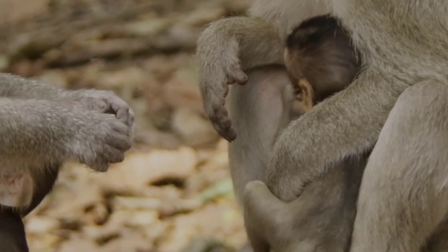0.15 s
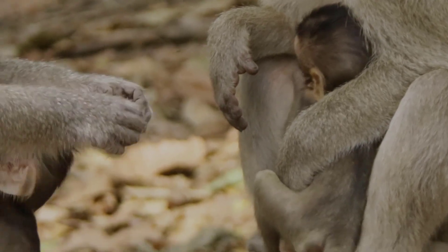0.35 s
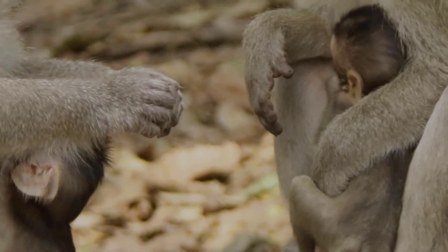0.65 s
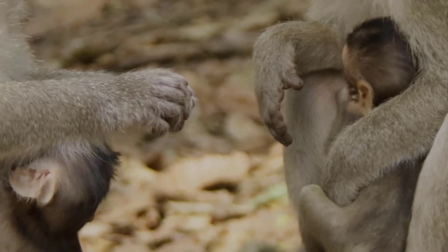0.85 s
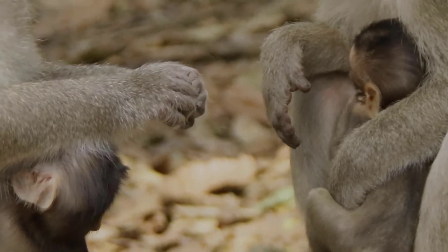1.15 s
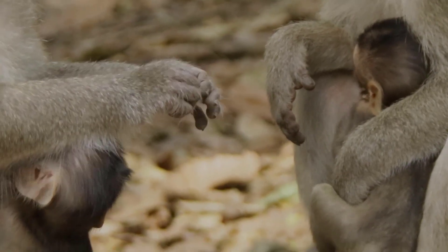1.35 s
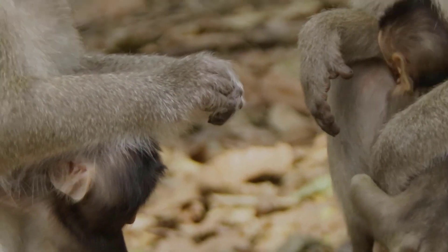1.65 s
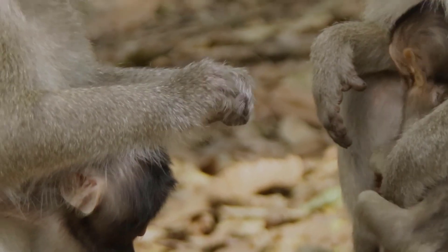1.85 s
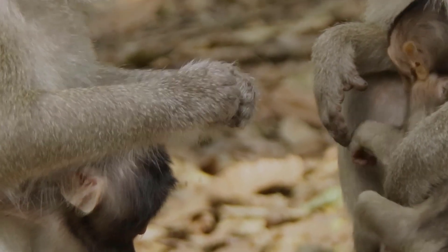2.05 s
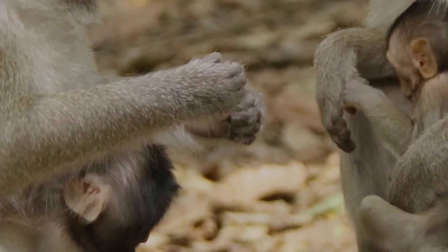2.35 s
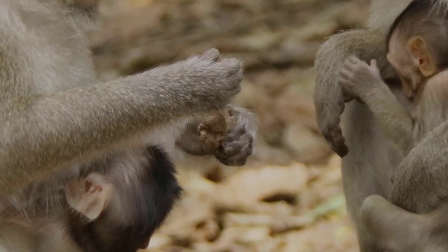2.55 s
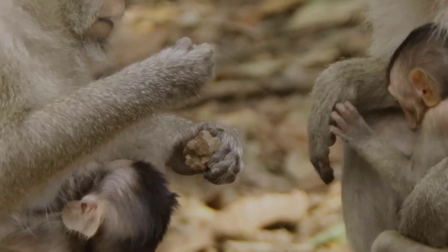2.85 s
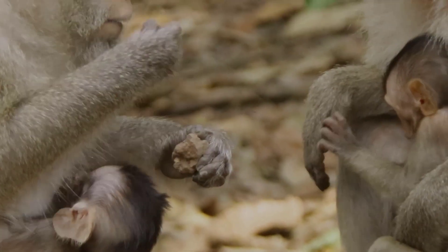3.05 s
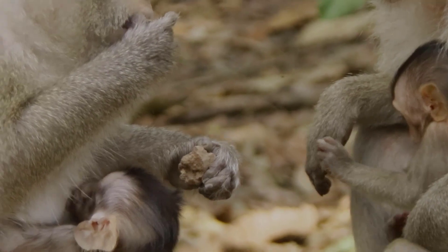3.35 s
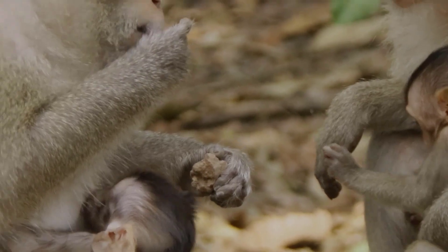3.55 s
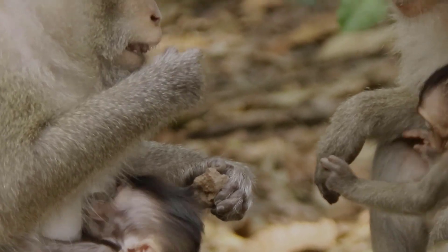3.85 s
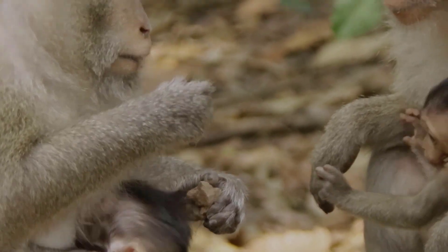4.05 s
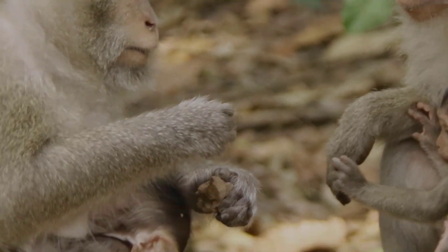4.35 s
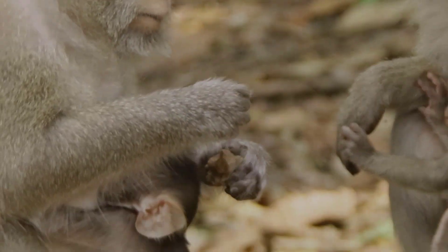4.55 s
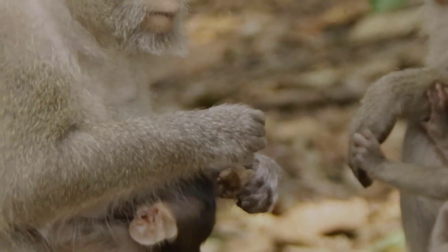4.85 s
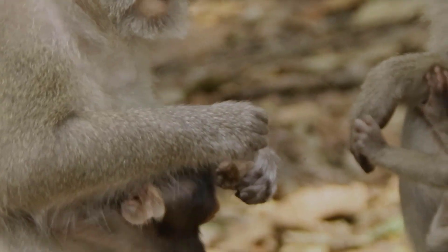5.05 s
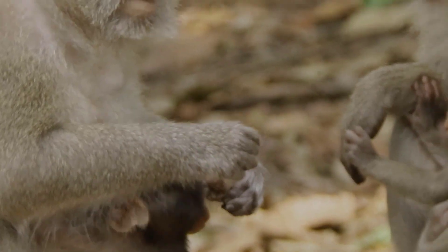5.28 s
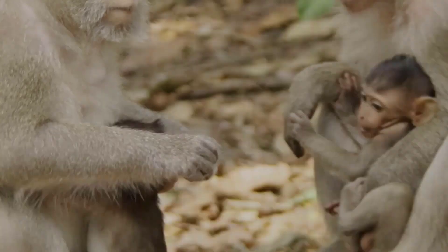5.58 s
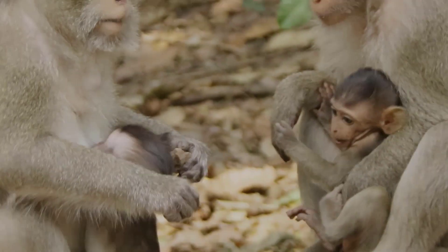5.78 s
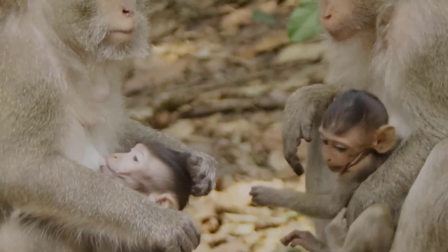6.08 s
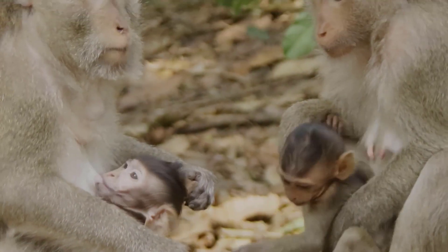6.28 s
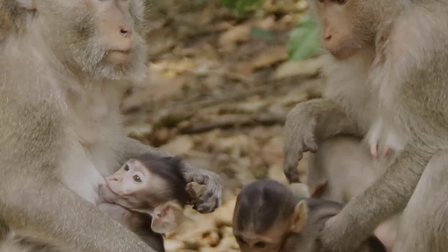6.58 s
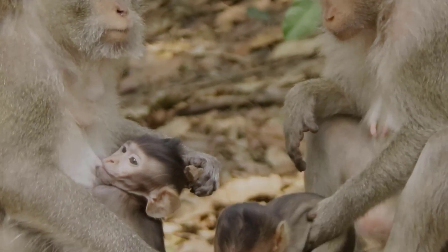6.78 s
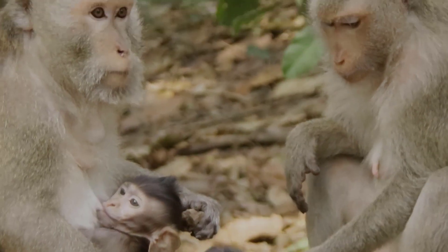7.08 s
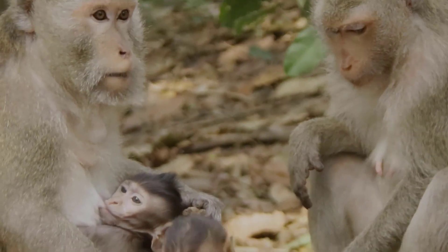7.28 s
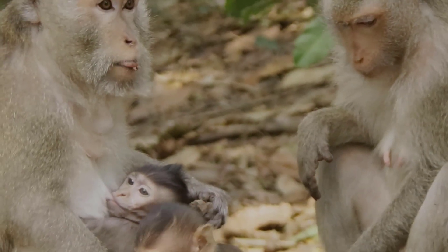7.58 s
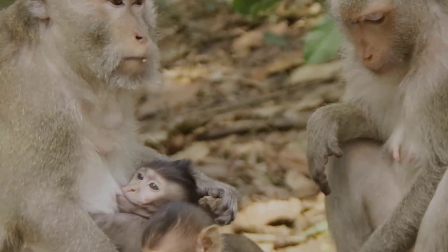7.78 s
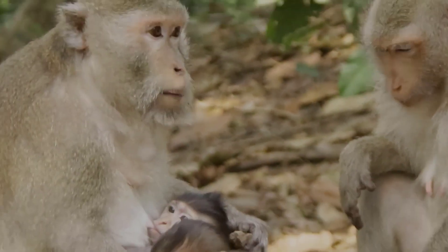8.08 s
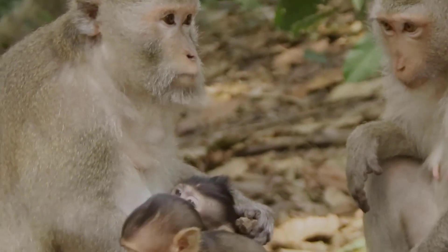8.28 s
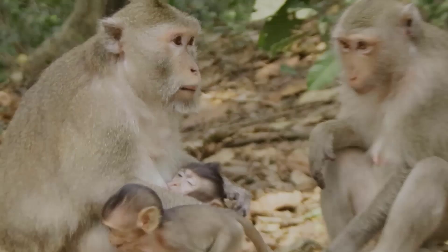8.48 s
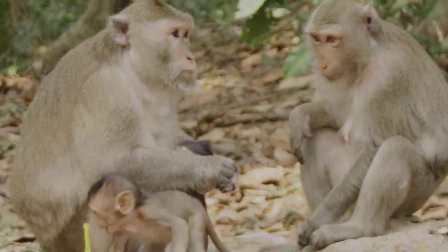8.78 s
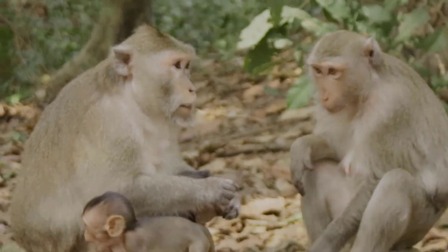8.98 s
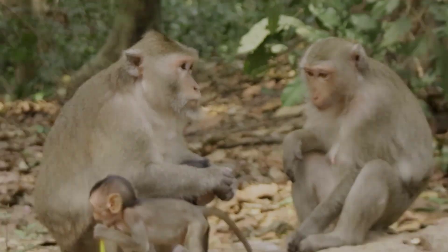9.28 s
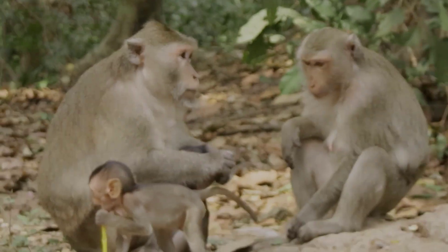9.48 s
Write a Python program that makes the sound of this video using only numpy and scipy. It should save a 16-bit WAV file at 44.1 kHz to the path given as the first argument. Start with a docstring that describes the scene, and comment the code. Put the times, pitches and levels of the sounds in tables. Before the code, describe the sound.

Far cicadas blur into one high drone that grows slightly throughout, over a soft, low hush of forest air. At about 1.2 seconds a bird, clear in front, gives a hoarse, quivering whistle that falls from a high start, holds its pitch and closes on a soft lower note by 1.6 seconds. From 1.9 to 4 seconds it makes six quick chirps, about 0.4 seconds apart, each plunging to a soft low ending. Then only insects and air remain. A faint chirp at 7.8 seconds opens the second bout, and dry leaves scuff softly once near 8.2 seconds. Four louder chirps follow at the same pace, from 8.2 to about 9.5 seconds. The ground and trunks throw back short echoes, and the whole background swells briefly around each call.

```python
"""A bird gives one long falling whistle, then two bouts of quick falling chirps, in a forest.
Each call is a quivering, slightly hoarse tone that slides down. Ground and trunks throw it back.
Far cicadas blur into one high drone over a low hush of air, and dry leaves scuff once.
The whole background swells briefly around each call."""
import sys
import numpy as np
from scipy import signal
from scipy.fft import rfft, irfft
from scipy.io import wavfile
from scipy.ndimage import uniform_filter1d

SR = 44100
rng = np.random.default_rng(int(sys.argv[2]) if len(sys.argv) > 2 else 0)


def master_out(mix):
    """Clip the mix to full scale and print it as 16-bit PCM to the path in sys.argv[1]."""
    frames = np.transpose(np.atleast_2d(mix))
    ceiling = np.clip(frames, -1, 1)
    pcm = np.round(ceiling * 32767).astype(np.int16)
    wavfile.write(sys.argv[1], SR, pcm)


N = 424683
TIME = np.arange(N) / SR

# The bird's chirps, one a row: (time [s], level [dB], pitch [factor], length [factor],
# low ending's level against the chirp [dB], its pitch [Hz], background swell [dB], swell length [s])
CHIRPS = [(1.907, -15.5, 0.94, 1, -13.5, 1627, 7.5, 0.22), (2.302, -13.5, 0.99, 1.01, -15, 1527, 6.5, .15),
          (2.696, -13, .99, 1.03, -17.5, 1513, 8, .145), (3.090, -12.5, .99, 1.15, -15, 1542, 7.5, 0.17),
          (3.490, -13, 1, 1.09, -12, 1522, 7.5, 0.26), (3.899, -15.5, 1, 1.03, -10.5, 1490, 7.5, 0.18),
          (7.802, -25.5, 0.93, .75, -5.5, 1540, 2, .18), (8.231, -15.5, 0.98, .99, -10.5, 1535, 8, 0.2),
          (8.623, -13.5, 0.98, 1.09, -14.5, 1545, 8, 0.2), (9.013, -14, 0.98, 1.05, -17, 1513, 8.5, 0.17),
          (9.408, -13.5, 0.96, 1, -20, 1568, 10, 0.16)]
WHISTLE_AT_S, WHISTLE_S = 1.214, 0.34
FADE_IN_S, FADE_OUT_S = 0.043, 0.032  # how fast the background moves to a new level and back


def gain_of(db):
    """Turns decibels into a factor to multiply a sound by."""
    return 10 ** (np.asarray(db) / 20)


def evened(x):
    """Scales a signal to an average strength (rms) of 1."""
    return x / np.sqrt(np.mean(x ** 2) + 1e-20)


def add(mix, start_s, sound):
    """Lays a sound into the mix at the given time."""
    part = mix[round(start_s * SR):][:len(sound)]
    part += sound[:len(part)]


def envelope(t, rise_s, hold_s, fall_s):
    """A loudness shape: rises from 0 at t = 0 to 1, holds, and falls back to 0."""
    return np.clip(np.minimum(t / rise_s, 1 + (rise_s + hold_s - t) / fall_s), 0, 1)


def drift(rate_hz):
    """A slow random wander, with little in it faster than the given rate."""
    hz = np.fft.rfftfreq(N, 1 / SR)
    return evened(irfft(rfft(rng.standard_normal(N)) * np.exp(-(hz / rate_hz) ** 2), N))


def flutter(width_hz):
    """A random wobble that smears a pure tone into a band about this wide."""
    r = np.exp(-np.pi * width_hz * np.pi / 2 / SR)
    return signal.lfilter([1], [1, -2 * r, r * r], rng.standard_normal(N) + 1j * rng.standard_normal(N))


def noise(colour, patchy_db, flicker_db, strand_db):
    """Noise of a given colour, with drifting patches, thin lingering tones (strands) and a flicker."""
    hz = np.fft.rfftfreq(2048, 1 / SR)
    real, imag, patches, strands = rng.standard_normal((4, len(hz), N // 512 + 5))  # pitch by time
    patches = evened(uniform_filter1d(uniform_filter1d(patches, size=7, axis=0), size=8, axis=1))
    strands = evened(uniform_filter1d(uniform_filter1d(strands, size=2, axis=0), size=9, axis=1))
    flicker = evened(uniform_filter1d(rng.standard_normal(real.shape[1]), size=3))
    moving_db = patchy_db * patches + strand_db * np.minimum(strands, 2) + flicker_db * flicker
    colour_hz, colour_db = np.transpose(colour)
    steady_db = np.interp(np.log(hz + 1), np.log(colour_hz + 1), colour_db)
    spectra = (real + 1j * imag) * gain_of(steady_db[:, None] + moving_db)
    return evened(signal.istft(spectra, nperseg=2048, noverlap=1536)[1][:N])


def air(hush_db=-43.5, hum_hz=160, hum_db=-58, low_cut_hz=38):
    """A soft hush of air and far-off rumble, with a faint, unsteady low hum."""
    # The colour of the hush: (frequency [Hz], relative level [dB])
    hush_colour = [(20, -23), (32, -7.5), (60, 2), (100, -0.5), (135, -1.5), (200, -3.5), (400, -7.5),
                   (800, -8.5), (1250, -11.5), (2200, -7.5), (4500, -15), (8500, -28.5), (11500, -29),
                   (14500, -26.5)]
    hum = np.sin(2 * np.pi * hum_hz * TIME) * drift(rate_hz=10.6)
    hush = noise(hush_colour, patchy_db=0.95, flicker_db=0.6, strand_db=3.3)
    hush = signal.lfilter(*signal.butter(2, low_cut_hz, "high", fs=SR), hush)
    return gain_of(hush_db) * hush + gain_of(hum_db) * evened(hum)


def cicadas(start_db=-35, growth_db_per_s=0.2734, dip_db=-3, waver_hz=14):
    """Countless far insects merge into a slowly growing drone; a few narrow voices throb within it."""
    # The colour of the drone: (frequency [Hz], relative level [dB])
    drone_colour = [(2000, -27.5), (2550, -16), (3000, -7), (3500, 0), (3900, -1.5), (4300, -3),
                    (4700, -14.5), (5200, -17.5), (5550, -23.5), (6400, -23), (6750, -26.5), (7150, -27),
                    (7550, -32.5), (9000, -42)]
    # Insects that stand out: (pitch [Hz], width [Hz], level before the swell [dB], throb depth [dB])
    voices = [(1782, 136, -48, 2.5), (2800, 9.3, -58, -1.5), (3643, 38, -49.5, 5), (3960, 52, -54, -5),
              (4660, 10, -72, 3), (7000, 40, -73, -3)]
    dip = envelope(TIME - WHISTLE_AT_S, FADE_IN_S, WHISTLE_S, FADE_OUT_S)  # during the long whistle
    drone = noise(drone_colour, patchy_db=0.0, flicker_db=0.45, strand_db=4.4)
    drone *= gain_of(start_db + growth_db_per_s * TIME + dip_db * dip)
    for hz, width_hz, db, throb_db in voices:
        effort = drift(rate_hz=12.88)  # the insect's push moves both its pitch and its loudness
        tone = np.exp(2j * np.pi * np.cumsum(hz + waver_hz * effort) / SR)
        voice = evened((flutter(width_hz) * tone).real)
        drone += gain_of(db + throb_db * np.minimum(effort, 2)) * voice
    return drone


def swell(rest_db=1.48, lead_s=0.024, rise_s=0.085, hold_s=0.03):
    """How much louder the background gets: it lifts around each call and sometimes stays up."""
    # Stretches where the background stays raised: (start [s], length [s], rise [dB])
    raised = [(1.2, 0.39, 3.5), (3.6, .11, 3.5), (7.83, .075, 4.5), (8.267, .29, 4), (9.05, 0.39, 3.5),
              (9.44, .25, 6)]
    rises_db = [db * envelope(TIME - start_s, FADE_IN_S, length_s - FADE_IN_S, FADE_OUT_S)
                for start_s, length_s, db in raised]
    for start_s, *_, db, length_s in CHIRPS:
        fall_s = max(length_s + lead_s - rise_s - hold_s, FADE_OUT_S)
        rises_db.append(db * envelope(TIME - start_s + lead_s, rise_s, hold_s, fall_s))
    return gain_of(rest_db + np.max(rises_db, axis=0))


def scuff(peak_s=8.178, spread_s=0.029, db=-38):
    """One brief soft scuff in the dry leaves."""
    # (frequency [Hz], relative level [dB])
    colour = [(400, -21), (900, -3), (1300, 3), (2400, -4), (4000, -26), (9000, -40)]
    leaves = noise(colour, patchy_db=2, flicker_db=0, strand_db=0)
    return gain_of(db) * leaves * np.exp(-((TIME - peak_s) / spread_s) ** 2)


def forest(song, decay_s, db, build_s, low_cut_hz):
    """Trunks and leaves scatter tiny echoes that build up and die away; low notes scatter less."""
    t = np.arange(SR) / SR
    echoes = rng.choice([-1., 1.], SR) * (rng.random(SR) < 2000 / SR)  # about 2000 a second
    echoes *= (1 - np.exp(-(t / build_s) ** 2)) * gain_of(-60 * t / decay_s)
    echoes /= np.linalg.norm(echoes)
    echoes = signal.lfilter(*signal.butter(2, low_cut_hz, "high", fs=SR), echoes)
    return gain_of(db) * signal.fftconvolve(song, echoes)[:N]


def with_echoes(song):
    """The song plus its first echoes, which boost and cancel it in turn so each slide throbs."""
    # Bounces off the ground and trunks: (delay [s], level against the song [dB])
    echoes = [(.0026, -29), (.0056, -5.5), (.0178, -25), (.0232, -8), (.036, -24)]
    heard = song.copy()
    for delay_s, db in echoes:
        add(heard, delay_s, gain_of(db) * song)
    return heard


def note(hz, quiver_share, rasp_db, rasp_hz=240, overtone_db=-40):
    """The bird's voice: a quivering tone that follows hz, with a fuzzy rasp just above its pitch."""
    t = np.arange(len(hz)) / SR
    fuzz = signal.sosfilt(signal.butter(3, rasp_hz, fs=SR, output="sos"), rng.standard_normal((3, SR)))
    quiver, fuzz_a, fuzz_b = evened(fuzz)[:, -len(t):]
    phase = 2 * np.pi * np.cumsum(hz * (1 + quiver_share * quiver)) / SR
    rasp_phase = phase + 2 * np.pi * rasp_hz * t
    rasp = fuzz_a * np.sin(rasp_phase) + fuzz_b * np.cos(rasp_phase)
    return np.sin(phase) + gain_of(overtone_db) * np.sin(2 * phase) + gain_of(rasp_db) * rasp


def whistle(top_hz=3420, held_hz=2012, settle_s=.041):
    """One hoarse whistle that falls from a high start and then holds its pitch."""
    # The whistle's loudness through the scene: (time [s], level [dB])
    levels = [(1.214, -42), (1.226, -18), (1.25, -28), (1.3, -16.5), (1.335, -13.5), (1.37, -20.5),
              (1.47, -18), (1.565, -18.5), (1.582, -54)]
    t = np.arange(0, WHISTLE_S, 1 / SR)
    hz = held_hz + (top_hz - held_hz) * np.exp(-t / settle_s)
    loudness = gain_of(np.interp(WHISTLE_AT_S + t, *np.transpose(levels)))
    loudness *= signal.windows.tukey(len(t), .04)  # soft edges, so it does not click
    return loudness * note(hz, quiver_share=.011, rasp_db=-13)


def low_note(hz=1533, db=-30):
    """The soft, level note that closes the whistle."""
    shape_s = (0.017, 0.018, 0.024)  # rise, hold, fall
    t = np.arange(0, sum(shape_s), 1 / SR)
    tone = note(np.full(len(t), hz), quiver_share=0.0071, rasp_db=-28)
    return gain_of(db) * envelope(t, *shape_s) * tone


def chirp(pitch, stretch, ending_db, ending_hz):
    """A chirp hangs on its top pitch, plunges, and gives a soft push on the low pitch where it lands."""
    top_hz = 2960 * pitch
    plunge_s, ending_at_s = .046, .052  # all times here are before stretching
    ending_shape_s = (.028, 0.0179, .026)  # rise, hold, fall
    t = np.arange(0, ending_at_s + sum(ending_shape_s), 1 / (SR * stretch))
    hz = ending_hz + (top_hz - ending_hz) * np.exp(-(t / plunge_s) ** 2)
    plunge = envelope(t, rise_s=0.017, hold_s=.012, fall_s=.027)
    ending = gain_of(ending_db) * envelope(t - ending_at_s, *ending_shape_s)
    return (plunge + ending) * note(hz, quiver_share=.016, rasp_db=-22)


def bird():
    """The whole song: the long whistle, its closing low note, then the chirps."""
    song = np.zeros(N)
    add(song, WHISTLE_AT_S, whistle())
    add(song, start_s=1.54, sound=low_note())
    for start_s, db, pitch, stretch, ending_db, ending_hz, _, _ in CHIRPS:
        add(song, start_s, gain_of(db) * chirp(pitch, stretch, ending_db, ending_hz))
    return song


def scene():
    """The bird in front; its scattered echoes, the insects and the air swell together behind it."""
    song = bird()
    near = forest(song, decay_s=.2, db=-12, build_s=.012, low_cut_hz=1500)
    far = forest(song, decay_s=.8, db=-16, build_s=.07, low_cut_hz=1300)
    background = swell() * (near + far + cicadas() + air())
    return (with_echoes(song) + background + scuff())[None]


def record(dry):
    """Cuts away the very highest treble, above 15600 Hz."""
    treble_cut = signal.firwin(511, 15600, window=("kaiser", 9), fs=SR)
    return signal.oaconvolve(dry, treble_cut[None], "same")


dry = scene()
out = record(dry)
master_out(out)
```